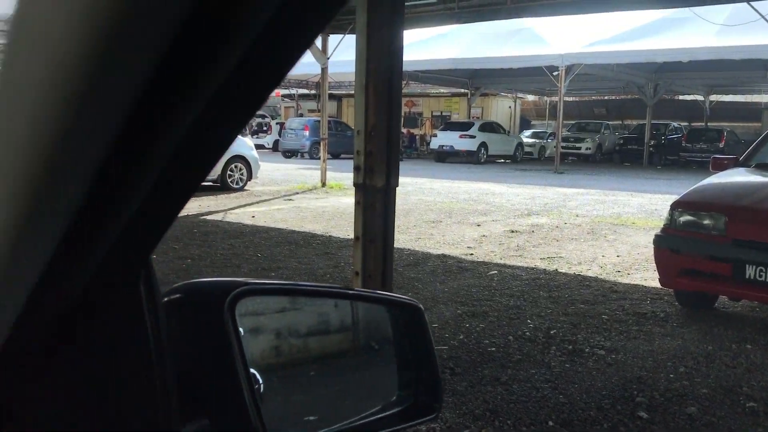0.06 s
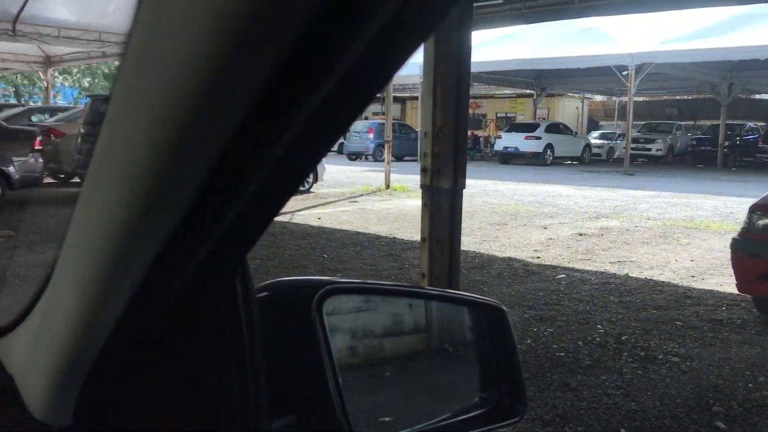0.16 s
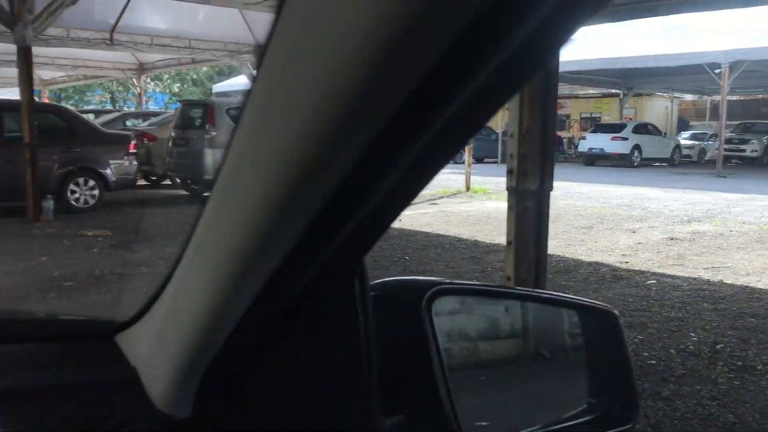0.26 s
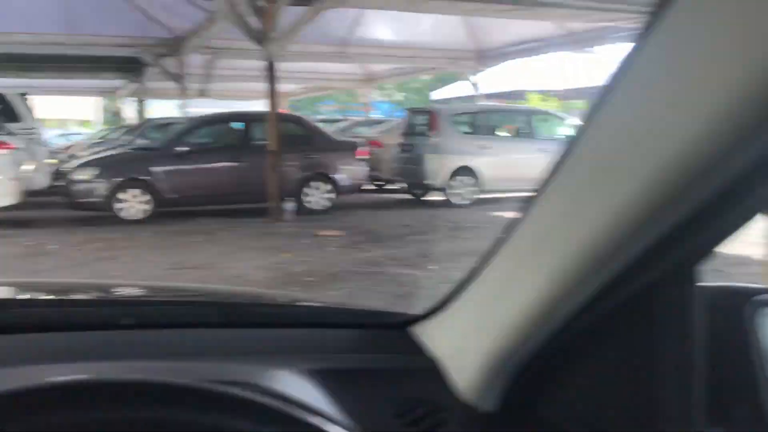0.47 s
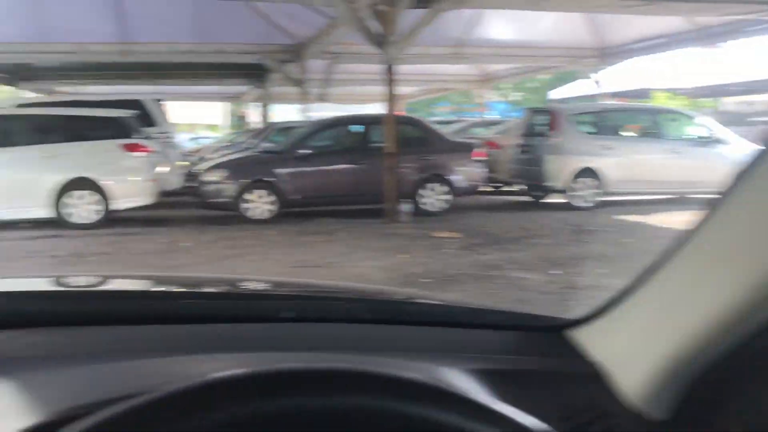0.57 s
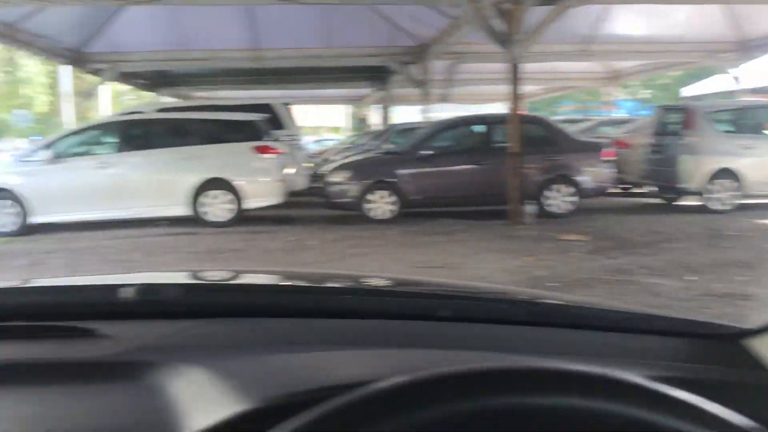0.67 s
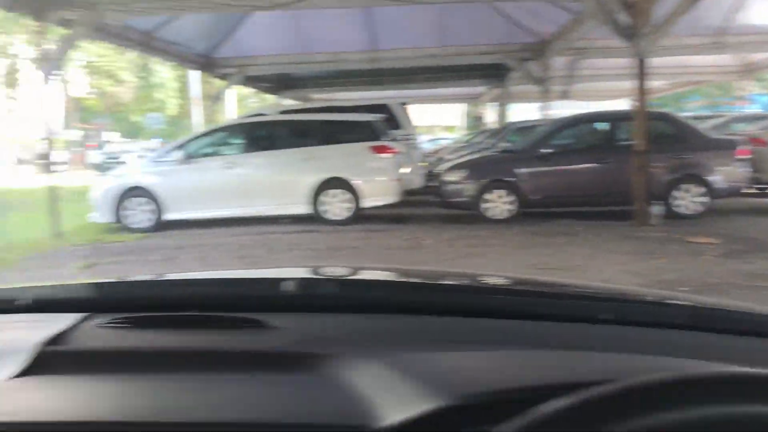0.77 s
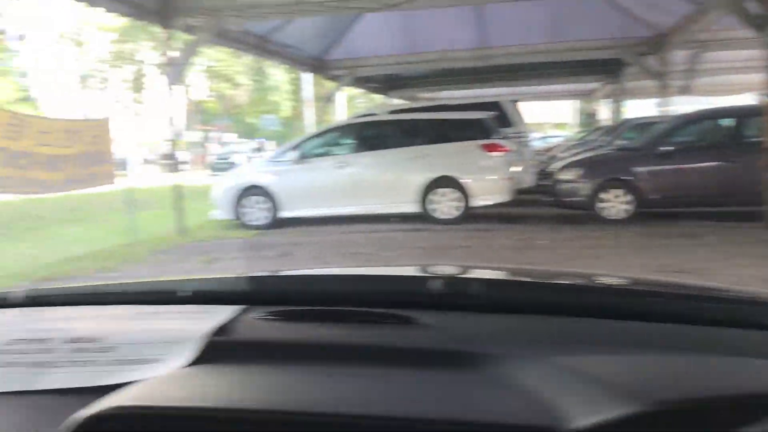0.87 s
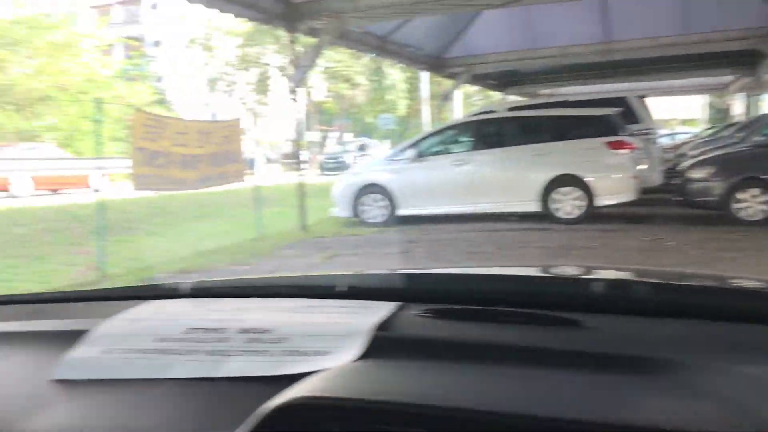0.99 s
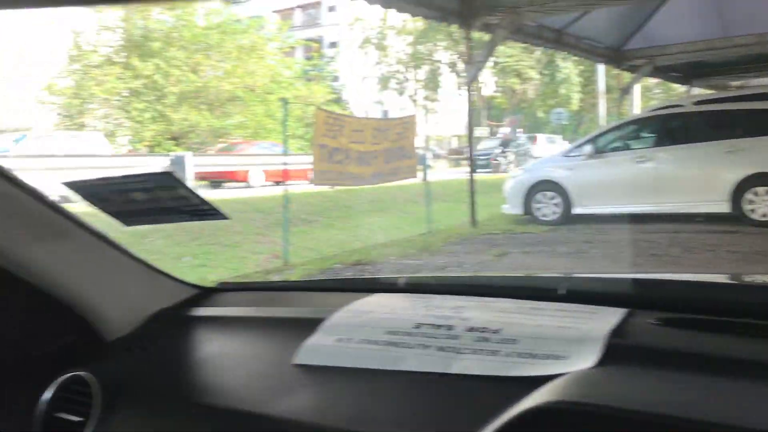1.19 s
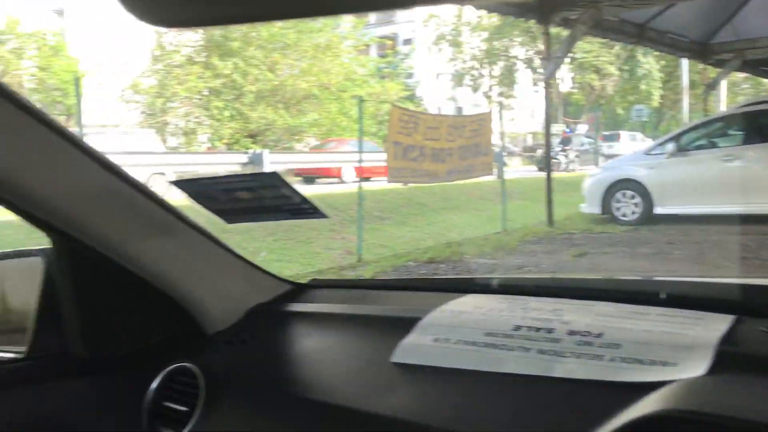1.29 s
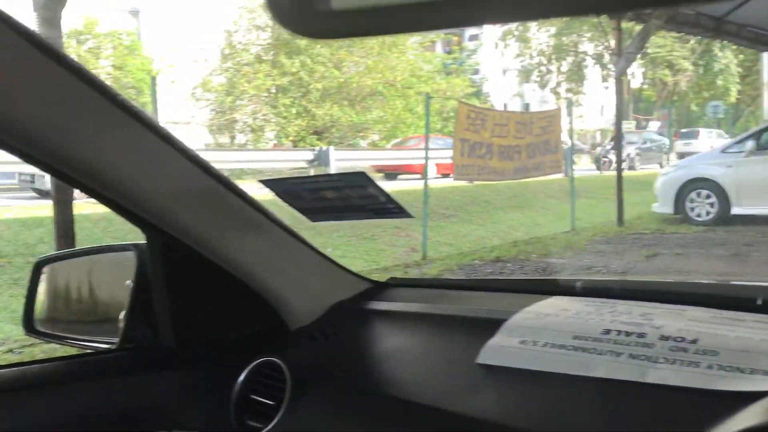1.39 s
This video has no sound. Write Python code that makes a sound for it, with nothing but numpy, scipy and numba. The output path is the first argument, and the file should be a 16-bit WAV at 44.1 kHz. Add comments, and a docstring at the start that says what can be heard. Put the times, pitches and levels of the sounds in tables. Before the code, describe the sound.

Inside a parked car, an electric window motor hums and whines for under half a second, the glass scrapes its seal and thuds into the frame, then clicks and a small knock; close phone microphone.

```python
"""Inside a parked car, heard by a phone, a power window closes. The motor hums at shaft speed, its hum surging
briefly under load near 0.34 s, whines at ten commutator bars a turn and hisses at its brushes, while the glass
scrapes its seals in filtered, grainy noise. The glass hits the frame: the door booms and shudders in short low
sines, and a noise rattle follows. Switch and trim click in noise bursts and ringing tones over the filtered-
noise rumble of the car park. The phone's gain control turns the sound down on the thump."""
import sys
import numpy as np
from scipy import signal
from scipy.fft import rfft, irfft
from scipy.io import wavfile
from scipy.ndimage import uniform_filter1d
from numba import njit

SR = 44100
rng = np.random.default_rng(int(sys.argv[2]) if len(sys.argv) > 2 else 0)


def natural_amplitude(level_db):
    """Convert a level in decibels to a linear amplitude factor, elementwise."""
    exponent = np.asarray(level_db, float) / 20
    return 10 ** exponent


def int16_out(signal):
    """Quantize to a 16-bit WAV file."""
    q = np.round(np.clip(np.atleast_2d(signal).T, -1, 1) * 32767)
    wavfile.write(sys.argv[1], SR, q.astype(np.int16))


N = 63945
T = np.arange(N) / SR


def level(x, db):
    """Scale a sound to an rms level in dB."""
    return x * natural_amplitude(db) / np.sqrt(np.mean(x ** 2))


def colour(x, table):
    """Filter a sound by (Hz, dB) points, joined along a logarithmic pitch scale."""
    hz, db = np.array(table, float).T
    f = np.arange(len(x) // 2 + 1) * SR / len(x) + 1  # the 1 Hz added avoids log(0)
    gain_db = np.interp(np.log(f), np.log(hz), db, -120, -120)
    return irfft(rfft(x) * natural_amplitude(gain_db), len(x))


def noise():
    """White noise for the whole scene."""
    return rng.standard_normal(N)


def walk(rate):
    """Slow random drift with a spread of 1; a higher rate in Hz drifts faster."""
    k = int(SR / rate)
    drift = uniform_filter1d(uniform_filter1d(noise(), k), k)
    return drift / drift.std()


def band(x, hz, width):
    """Pass a sound twice through a resonance of the given centre and width in Hz."""
    b, a = signal.iirpeak(min(hz, .45 * SR), hz / min(width, .4 * SR), SR)
    return signal.lfilter(b, a, signal.lfilter(b, a, x))


def ring(x, modes, t60):
    """Sum of decaying tones struck by x, neighbours in opposite phase; t60 is the time to fall 60 dB."""
    out = 0
    for k, (hz, db) in enumerate(modes):
        pole = np.exp(2j * np.pi * hz / SR - np.log(1000) / (t60 * SR))
        tone = signal.lfilter([1], [1, -pole], x).imag
        out = out + (-1) ** k * natural_amplitude(db) * tone
    return out


def gate(start, length, attack, release):
    """Straight rise, hold until start + length, then exponential release; all in seconds."""
    rise = np.clip((T - start) / attack, 0, 1)
    return rise * np.exp(-np.clip(T - start - length, 0, None) / release)


def microphone_hiss():
    """Microphone hiss: faint filtered noise whose strength drifts before levelling."""
    # spectrum of the hiss: pitch_hz, relative level_db (per Hz)
    hiss_colour = [(1290, -41), (2200, -6), (3440, -4.5), (4270, -6), (5000, -10.5), (5960, -6.5),
                   (9720, -9), (10600, -16), (11800, -8.5), (16000, -10)]
    return level(colour(noise() * natural_amplitude(0.8 * walk(33)), hiss_colour), -72)


def car_park():
    """Distant rumble through the closed car: mostly low noise, swelling a little."""
    # spectrum of the rumble: pitch_hz, relative level_db (per Hz)
    floor_colour = [(12, -34), (20, -8.5), (64, 2), (86, -11), (125, -2.5), (204, -14), (263, -13),
                    (430, -26), (625, -27.5), (746, -29.5), (2200, -40.5), (2860, -63), (4840, -120)]
    swell_db = -1 * walk(8)
    return level(colour(noise() * natural_amplitude(swell_db), floor_colour), -46)


def cracks():
    """Switch and trim clicks: bands of noise that start sharply and die away."""
    # clicks: start_s, level_db, centre_hz, width_hz, t60_s (time to fall 60 dB)
    click_table = [(0.404, -58, 13000, 8000, 0.067), (.4532, -50, 14600, 9000, 0.055),
                   (0.4525, -48, 6500, 9100, 0.062), (0.455, -41, 1090, 740, 0.046),
                   (.494, -65, 2960, 6000, 0.061), (.515, -56.5, 2100, 2500, .025),
                   (0.5321, -57, 6500, 11000, 0.02), (0.6646, -66.5, 2700, 3000, .05),
                   (1.0375, -57.5, 4830, 11800, 0.035), (1.038, -56.5, 1600, 3500, 0.083),
                   (1.2533, -71.5, 7140, 7000, 0.026), (1.3479, -57, 11500, 5900, 0.024),
                   (1.3546, -66, 11000, 4000, 0.042), (1.418, -67.5, 7260, 7040, 0.051)]
    rise_s, hold_s = .0005, .002
    out = 0
    for start, db, hz, width, t60 in click_table:
        burst = level(band(noise(), hz, width), db)
        out = out + burst * gate(start, hold_s, rise_s, t60 / np.log(1000))
    return out


def trim_knocks():
    """Brief rough pushes, with bounces, set the resonances of the trim panel ringing."""
    # knocks on the panel: start_s, level_db, contact_s
    knocks = [(0.4547, -43.5, 0.00032), (1.0382, -41.5, 0.00057), (1.0415, -46.5, 0.00058),
              (1.0485, -47, 0.0006), (1.061, -56, 0.00025)]
    # panel resonances: pitch_hz, relative level_db
    trim_modes = [(600, 2), (705, 4.5), (815, -1), (910, -2.5), (1100, 9.5), (1180, 2.5), (1355, 5),
                  (1495, -1), (1580, 2), (1705, -1), (4430, -20)]
    push = 0
    for start, db, contact in knocks:
        half_sine = np.sin(np.pi * np.clip((T - start) / contact, 0, 1))
        push = push + natural_amplitude(db) * half_sine / (contact * SR)  # same total push however long the contact
    rough_push = push * (1 + .5 * noise())
    return ring(rough_push, trim_modes, t60=.055)


def scrape():
    """Glass rubbing on the rubber seal: noise made grainy by fast random changes of strength."""
    # scrapes: start_s, length_s, level_db
    scrapes = [(0.193, 0.081, -44.5), (0.322, 0.057, -47)]
    # spectrum of the rubbing: pitch_hz, relative level_db (per Hz)
    scrape_colour = [(530, -29), (900, -30), (1030, -4.5), (1460, -6), (1900, 0.5), (2570, -9), (3860, -2),
                     (4460, -8.5), (5610, -9.5), (7490, -18.5), (10600, -19), (15100, -18), (16000, -25)]
    attack_s, release_s, grain_db = 0.014, 0.0057, 1.8
    rub = level(colour(noise() * natural_amplitude(grain_db * walk(290)), scrape_colour), 0)
    shape = sum(natural_amplitude(db) * gate(start, length, attack_s, release_s) for start, length, db in scrapes)
    return rub * shape


def low_thuds():
    """Low thuds: each is a short, rough low sine that dies away. Most are the door shuddering; the one near
    0.34 s is the motor's hum surging under load."""
    # thuds: start_s, level_db, pitch_hz, driven_s, t60_s (time to fall 60 dB)
    thud_table = [(.29, -42, 168, 0.041, .06), (0.342, -23.5, 75.7, 0.017, 0.12),
                  (0.3973, -14.5, 103.6, .024, 0.023), (.399, -26.5, 165.8, 0.029, 0.08),
                  (.4, -35, 216, 0.019, 0.06), (0.404, -31, 323, 0.0182, 0.02),
                  (.42, -23, 52, 0.017, 0.089), (0.431, -27.5, 136.3, 0.058, 0.02),
                  (.465, -32.5, 170, 0.0099, 0.027), (.455, -35, 255.3, 0.0145, 0.075),
                  (0.479, -44, 344, 0.021, 0.092), (0.503, -38.5, 255.7, 0.023, 0.023),
                  (0.528, -36, 182.3, .02, 0.082), (0.551, -34, 123.7, 0.0259, 0.027),
                  (1.046, -36, 87.6, 0.026, 0.11), (1.055, -37, 151.5, 0.016, 0.076),
                  (1.252, -44, 57.5, .03, 0.06)]
    rise_cycles, roughness = .35, .15
    out = 0
    for start, db, hz, driven, t60 in thud_table:
        shake = -natural_amplitude(db) * np.sin(2 * np.pi * hz * (T - start))  # first swing is downward
        shape = gate(start, driven, rise_cycles / hz, t60 / np.log(1000))
        out = out + shake * shape * (1 + roughness * walk(107))
    return out


def door_landing():
    """As the glass lands, the door rumbles loosely and the glass rattles: two bands of noise."""
    landing_s, rattle_length_s = .396, .036
    rumble = level(band(noise(), hz=222, width=232), -43.5)
    rumble = rumble * gate(landing_s, 0.087, 0.002, 0.053)
    rattle = level(band(noise() * natural_amplitude(2.1 * walk(200)), hz=935, width=1020), -42)
    burst = gate(landing_s, rattle_length_s, 0.0071, 0.0013)
    tail = natural_amplitude(-16) * gate(landing_s, rattle_length_s, 0.0016, 0.12)
    return rattle * (burst + tail) + rumble


def motor():
    """Hum at the shaft speed, whine as commutator bars pass, and brush hiss pulsed by the bars, until the stall."""
    # motor course: time_s, whine_hz, whine_level_db, hum_level_db (before small random drifts)
    motor_course = [(0, 735, -53, -52), (.04, 738.6, -45, -44), (.095, 736, -47.5, -48),
                    (0.131, 739, -47.5, -38), (.165, 738.6, -46.5, -47), (.205, 737.3, -46.5, -38),
                    (.28, 731.7, -48.5, -43), (0.312, 736.5, -46, -36.5), (0.347, 741, -53, -50),
                    (0.357, 728, -49.5, -61), (.372, 700, -52, -54), (.39, 645, -75, -45)]
    # hum tones: multiple of shaft speed, level_db against the hum
    hum_orders = [(1, 1), (2, -6.5), (3, -15.5)]
    # spectrum of the brush and gear hiss: pitch_hz, relative level_db (per Hz)
    brush_colour = [(150, 1.5), (250, -12), (493, -9.5), (662, -15), (735, -17), (802, -16.5),
                    (1380, -16.5), (3060, -18), (3340, -18.5), (4490, -18), (4900, -18.5), (5730, -18),
                    (10400, -28.5), (14700, -25), (16000, -31)]
    bars = 10  # commutator bars a turn
    time_s, whine_hz, whine_db, hum_db = np.array(motor_course).T

    bar_hz = np.interp(T, time_s, whine_hz) * (1 + .0012 * walk(40))
    turn = 2 * np.pi * np.cumsum(bar_hz) / SR / bars  # shaft angle in radians

    hum = 0
    for order, db in hum_orders:
        tone = np.sin(round(order) * turn + rng.uniform(0, 2 * np.pi))
        hum = hum + natural_amplitude(db + 1.2 * walk(20)) * tone
    hum = hum * natural_amplitude(np.interp(T, time_s, hum_db))

    whine = np.sin(bars * turn) + natural_amplitude(-21) * np.sin(2 * bars * turn)  # with a faint octave
    whine = whine * natural_amplitude(np.interp(T, time_s, whine_db) + 0.31 * walk(25))
    tones = np.sqrt(2) * (hum + whine)  # makes the levels rms

    bar_pulse = 1 + 0.23 * np.sin(bars * turn)
    hiss = level(colour(noise() * bar_pulse, brush_colour), -46.5)
    hiss = hiss * natural_amplitude(.7 * walk(5.3))

    # both gates are fully open from the first sample
    stall_s, brush_end_s = .39, .393
    tones = tones * gate(-1, 1 + stall_s, 1, .006)
    return tones + hiss * gate(-1, 1 + brush_end_s, 1, .011)


def cabin(near):
    """Faint echo of the small, padded cabin: the sound smeared by a dying noise tail."""
    t60_s, echo_db = 0.39, -24
    t = T[:SR // 2]
    tail = band(rng.standard_normal(len(t)), 600, 5200) * np.exp(-np.log(1000) * t / t60_s)
    tail = tail / np.sqrt(np.sum(tail ** 2))
    return natural_amplitude(echo_db) * signal.fftconvolve(near, tail)[:N]


def scene():
    """Scrapes, door and clicks with their cabin echo, plus the motor, car park and hiss without it."""
    near = cracks() + trim_knocks() + scrape() + low_thuds() + door_landing()
    mix = microphone_hiss() + car_park() + near + cabin(near) + motor()
    return mix[None]  # one channel


@njit
def follow(x, up, down):
    """Follow the strength of a sound, moving by the fraction up or down at each sample."""
    e, out = 1e-9, np.empty(len(x))
    for i in range(len(x)):
        e += (abs(x[i]) - e) * (up if abs(x[i]) > e else down)
        out[i] = e
    return out


def gain_control(x):
    """The phone turns down moments whose followed strength passes a threshold."""
    threshold_db, ratio, attack_s, release_s = -21, 2.4, 0.0047, 0.09
    strength = follow(x, 1 / (attack_s * SR), 1 / (release_s * SR))
    gain = np.minimum(1, natural_amplitude(threshold_db) / strength) ** (1 - 1 / ratio)
    return x * gain


def roll_off(x):
    """The treble ends steeply here."""
    return signal.sosfilt(signal.butter(12, 16450, fs=SR, output="sos"), x)


def record(dry):
    """The phone's gain control shapes the scene into the finished mix."""
    mix = gain_control(dry[0])
    return roll_off(mix)


dry = scene()
out = record(dry)
int16_out(out)
```